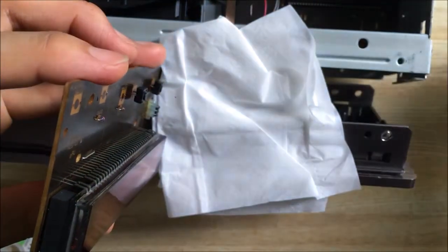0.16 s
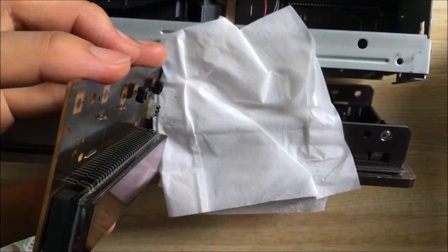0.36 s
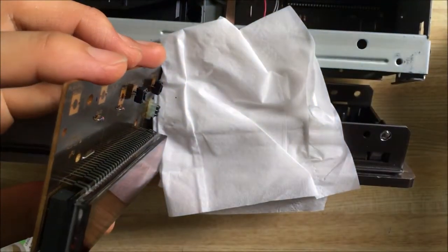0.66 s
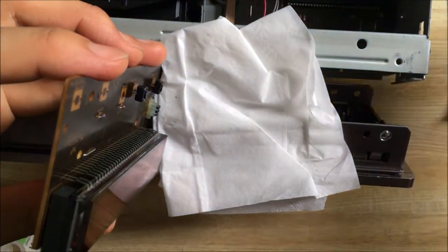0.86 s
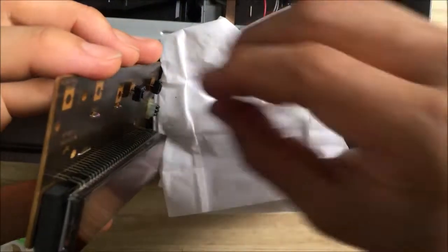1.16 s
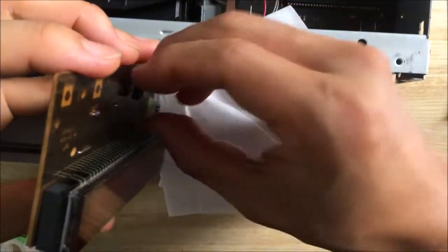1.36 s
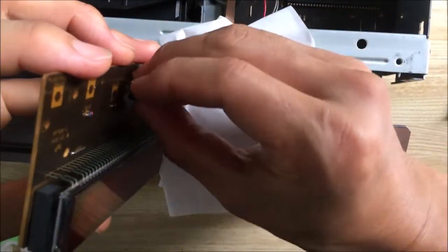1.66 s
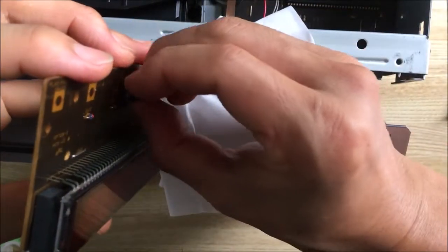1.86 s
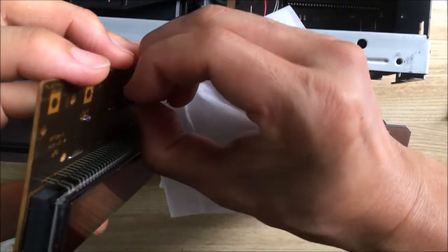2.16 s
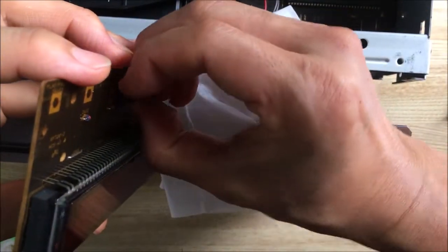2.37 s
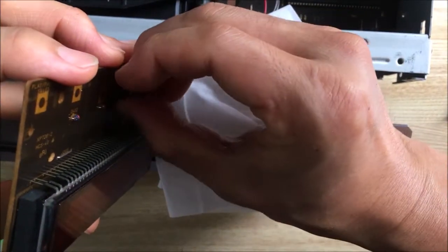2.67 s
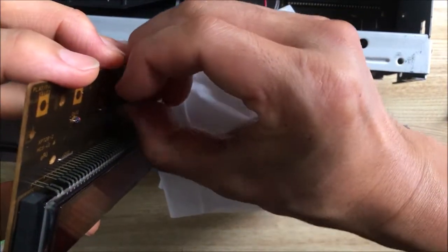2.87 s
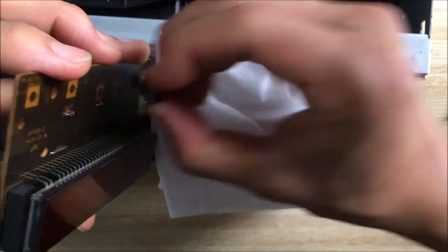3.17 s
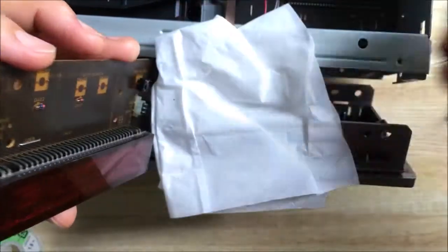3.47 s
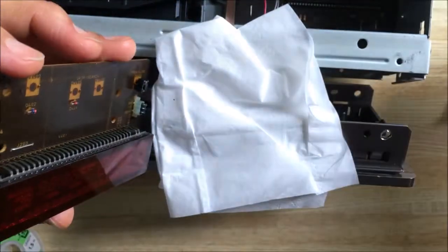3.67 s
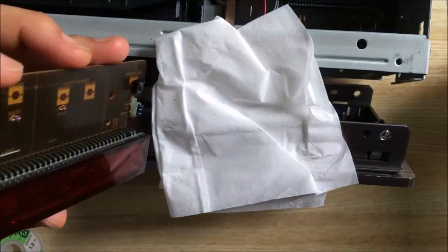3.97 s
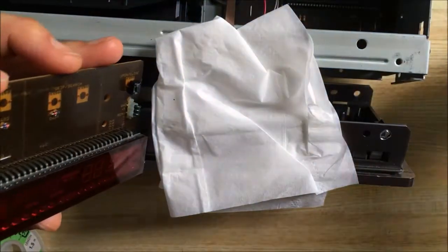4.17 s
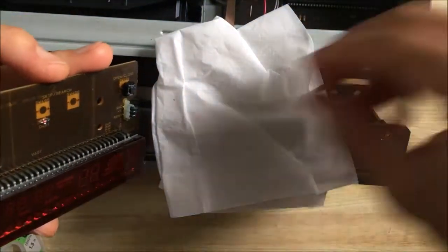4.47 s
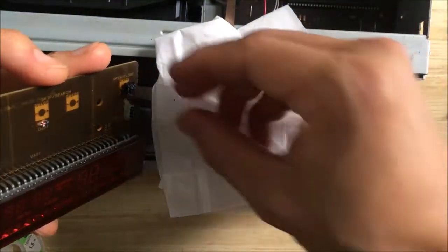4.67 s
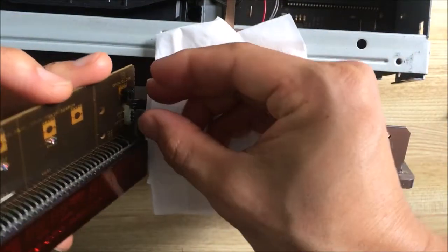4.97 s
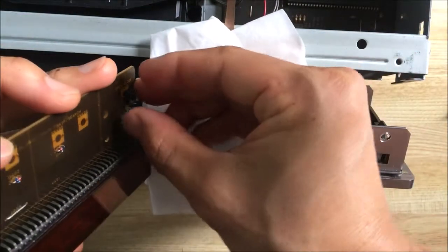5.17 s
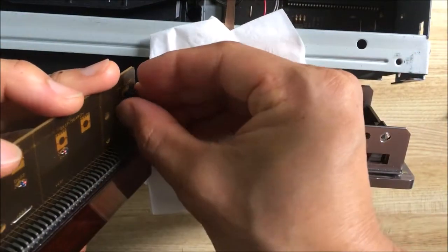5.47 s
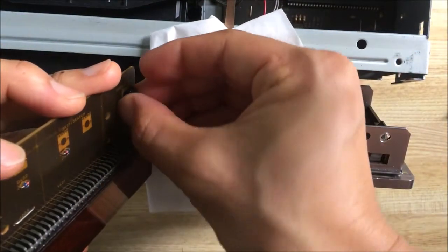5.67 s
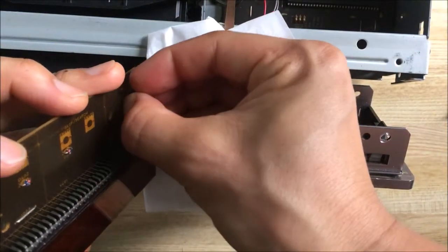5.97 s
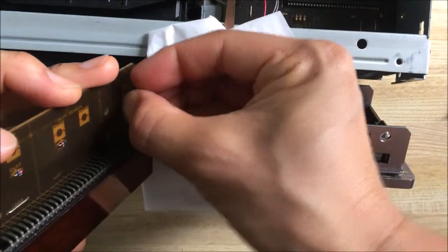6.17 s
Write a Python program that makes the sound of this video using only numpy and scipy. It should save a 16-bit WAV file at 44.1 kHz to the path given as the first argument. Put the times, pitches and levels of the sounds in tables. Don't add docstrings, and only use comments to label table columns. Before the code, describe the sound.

Close, dry clicks and tiny bright ticks from a little switch on a circuit board, over a wavering low rumble and soft hiss.

```python
import sys
import numpy as np
from scipy import signal
from scipy.fft import rfft, irfft
from scipy.io import wavfile
from scipy.ndimage import uniform_filter1d

SR = 44100
rng = np.random.default_rng(int(sys.argv[2]) if len(sys.argv) > 2 else 0)


def store_wav(level_fs):
    pcm = np.round(np.clip(np.atleast_2d(level_fs), -1, 1) * 32767)
    wavfile.write(sys.argv[1], SR, pcm.T.astype(np.int16))


def voltage_ratio(level):
    return 10 ** (np.asarray(level, float) / 20)


N = 278712

# t/s, level/dB
RUMBLE_LEVEL = [(0, -44.5), (.4, -45.5), (.62, -50.5), (1.05, -45), (1.25, -50.5), (1.55, -44),
                (1.8, -48.5), (2.3, -44), (2.75, -45), (3.1, -42), (3.5, -40), (4.0, -43.5), (4.35, -40),
                (4.75, -44), (5.2, -48.5), (5.7, -43), (6.1, -42.5), (6.32, -45)]
# f/Hz, density/dB
RUMBLE_COLOUR = [(20, -35), (35, -14), (50, 1), (69, 9), (85, 2), (110, -18.5), (150, -59.5)]
# t/s, depth/dB
LULLS = [(.52, 11), (1.13, 9), (1.45, 5), (1.96, 7), (2.03, 7), (2.18, 9), (2.33, 7.5), (2.52, 2.5),
         (2.8, 13), (2.93, 6), (3.16, 7.5), (3.33, 8.5), (3.67, 13), (3.99, 10), (4.549, 14), (4.81, 5.5),
         (4.92, 6.5), (5.12, 18), (5.66, 3), (5.98, 16), (6.25, 14)]
LULL_S = 0.027
# f/Hz, density/dB
AIR_COLOUR = [(59, -66), (100, 1), (124, -4.5), (155, -1.5), (253, -7), (332, -10), (396, -19), (693, -20),
              (862, -22), (2600, -30), (3380, -44), (5720, -120)]
# f/Hz, density/dB
HISS_COLOUR = [(1530, -49), (2600, -8), (3330, -4.5), (3790, -4), (4820, -4.5), (6080, 0.5), (7680, -11),
               (8930, -5.5), (10400, -9), (11300, -4.5), (13900, -3.5), (15100, -2.5), (15700, -4.5)]
AIR_DB, HISS_DB = -59, -67.5
# f/Hz, width/Hz, level/dB
FAN_LINES = [(1810, 24, -81.5), (2154, 4.3, -83.5)]

# start t/s, crackle level/dB, fade/(dB/s), length/s
RATTLE_BURSTS = [
    (1.0188, -41, 280, 0.018),
    (1.033, -43, 100, 0.005),
    (1.056, -45.5, 300, 0.078),
]
# f/Hz, density/dB
RATTLE_COLOUR = [(290, -40), (500, -2), (1020, -7), (1310, 1), (2120, -8), (3010, -5), (4470, -7),
                 (4880, -13.5), (14600, -11.5), (16400, -13.5)]
RATTLE_RISE_S = 0.0014
TONES_HZ = [280, 760, 1068, 1690, 1910, 3675, 11910, 12160, 14280]
# level/dB, t60/s
TONE_DECAYS = [(-40, .3), (-43, 0.2), (-42, 0.28), (-41.5, 0.18), (-42, 0.22), (-44, 0.22), (-41, .15),
               (-36, 0.18), (-31, 0.067)]
# t/s, length/s
TONES_SPAN = (1.036, 0.0273)
# t/s, level/dB
LATE_RINGS = [
    (1.0575, -40),
    (1.068, -42),
]
LATE_RING_HZ = 11100

# f/Hz, width/Hz, level/dB
DOME_MODES = [(11900, 700, -3), (12800, 700, -4), (13700, 800, -1.5), (15400, 800, -1)]
# f/Hz, width/Hz, level/dB
HOUSING_MODES = [(6800, 700, -2), (9300, 800, 0)]
# f/Hz, width/Hz, level/dB
PLATE_MODES = [(1200, 600, -14.5), (2100, 800, -14), (3100, 700, -10), (4270, 800, -10), (5500, 1000, -10)]
# t/s, dome, housing and board peak level/dB, board mode f/Hz
SNAPS = [(1.0205, -31, -36, -33, 3420), (1.0355, -32, -37, -47, 3600), (1.0366, -23, -46, -56, 1810),
         (1.058, -44, -39, -44, 1810), (1.0695, -55, -40.5, -63, 2990), (1.1132, -53, -54, -55, 3770),
         (2.351, -35, -45, -59, 4340), (2.4912, -53, -55, -55.5, 4040), (3.7465, -64, -63, -60, 2520),
         (2.919, -32.5, -42, -36.5, 3020), (2.9194, -56, -64, -39, 4270), (3.4262, -52, -57, -55.5, 3690),
         (3.7812, -60, -57, -50.5, 2700), (3.7816, -50, -51.5, -51, 3960), (6.1013, -29.5, -44, -48, 3000),
         (6.1032, -46, -52, -57, 4500), (6.1145, -48, -37.5, -42, 2800), (6.115, -53, -48, -42, 4970),
         (6.1177, -63, -55, -38, 1370), (6.1592, -63, -54, -55, 3470), (6.1662, -63, -55.5, -56, 3740)]
# t/s, peak level/dB, board mode f/Hz
TAPS = [(1.4425, -60, 3170), (3.388, -54, 2800), (3.3896, -46, 2700), (5.4912, -53, 3220),
        (5.494, -57.5, 2700), (5.5743, -59, 2460), (5.591, -56, 1760), (5.6022, -55, 2840),
        (5.6062, -54, 2750), (5.685, -54, 1490), (5.997, -63, 2130), (6.0626, -58, 1820),
        (6.2024, -62, 3390), (6.312, -61, 3200)]
TAP_DOME_DB, TAP_HOUSING_DB = -10, -13
# t/s, dome peak level/dB
PINGS = [(1.9605, -50), (1.9853, -49.5), (1.9962, -59), (2.0799, -64), (2.1346, -54), (2.3193, -60),
         (2.327, -45), (2.3347, -51), (2.3414, -54), (2.411, -56), (2.6033, -54), (2.7418, -55),
         (2.7466, -52), (2.7687, -50), (2.8059, -58), (2.905, -53), (2.9084, -58), (2.9113, -56),
         (2.9176, -45), (2.945, -60), (4.5365, -44), (4.5409, -44), (4.828, -56), (4.8356, -50),
         (5.4982, -47), (5.742, -57), (5.7919, -55.5), (5.803, -54), (5.9516, -57), (5.9635, -53)]
PING_HOUSING_DB, PING_PLATE_DB, DOME_SPOT_HZ = -9, -20, 3400
# start t/s, length/s, rate/(1/s)
CREEP = [(1.95, .12, 40), (2.39, .04, 60), (2.74, .17, 30), (5.68, .12, 25), (5.96, .06, 30)]
CREEP_DB, CREEP_SPREAD_DB = -62, 2.5
# t/s, peak level/dB
STUTTER = [(2.5767, -50), (2.5797, -40), (2.5814, -39), (2.585, -43), (2.5883, -48), (2.592, -38.5)]
STUTTER_HOUSING_DB, STUTTER_PLATE_DB = -6, -24.5

# t/s, peak level/dB, blow length/ms, grip damping factor
KNOCKS = [
    (1.022, -26, 0.75, 1),
    (1.028, -57, 1.6, 1.2),
    (1.036, -25.5, 0.74, 0.95),
    (1.033, -27, 1.64, 1.9),
    (1.055, -34, 0.36, 1.3),
    (1.071, -27.5, 1.05, 0.73),
    (1.092, -39, 0.6, 0.35),
    (3.88, -43, 1.1, 0.99),
    (4.152, -38, 1.7, 3.1),
]
# f/Hz, level/dB, t60/s
BODY_MODES = [(130, 8, 0.048), (202, 15, 0.037), (277.6, 15.5, 0.088), (379, 6.5, 0.052), (561, 2.5, 0.17),
              (800, 4, 0.08), (1280, 8, 0.081), (1890, -37, .05)]
# t/s, peak level/dB, blow length/ms, grip damping factor
RELEASES = [
    (6.1155, -34, 0.24, 1.3),
    (6.1178, -23.5, 0.85, 0.72),
]
# f/Hz, level/dB, t60/s
HELD_MODES = [(218, -7, 0.097), (294, 4, 0.047), (364, -3.5, 0.065), (527, -12.5, 0.069), (1024, -5, 0.025),
              (2150, -20, .05)]

# centre t/s, length/s, level/dB, lowest f/Hz, highest f/Hz
RUBS = [(1.45, 0.061, -65, 11000, 15900), (1.46, 0.074, -68.5, 2200, 4200),
        (2.34, 0.079, -64, 10900, 16000), (2.417, 0.065, -66.5, 9000, 15900),
        (2.937, 0.039, -81, 2000, 5000), (2.921, 0.015, -49, 11500, 16100), (4.17, 0.062, -69, 9000, 16000),
        (4.544, 0.072, -56.5, 5460, 15900), (4.835, 0.15, -65, 10400, 15000),
        (4.925, 0.59, -71.5, 8000, 15500), (5.051, 0.61, -68.5, 900, 4500), (5.082, 0.21, -67, 860, 1300),
        (4.633, 0.036, -59.5, 8750, 15400), (5.16, 0.13, -68, 5000, 15500),
        (5.597, 0.062, -64.5, 1490, 9300), (5.687, 0.026, -63, 900, 15000), (6.021, 0.094, -67, 1490, 9050),
        (6.122, 0.057, -60, 700, 3470), (6.245, 0.099, -60.5, 1500, 15500), (6.215, 0.32, -66.5, 685, 1430),
        (2.165, 0.041, -71, 1000, 3000), (5.493, 0.024, -57, 8060, 16000)]
# centre t/s, length/s, f/Hz, level/dB
WHINE_SWELLS = [(1.87, .75, 703, -72.5), (2.371, .5, 694, -69), (2.802, .3, 700, -78),
                (2.971, .2, 695, -75), (3.183, .12, 683, -68), (3.546, .4, 690, -78)]

STEADY_EDGE_HZ, SHARP_EDGE_HZ, LAST_EDGE_HZ = 15870, 15950, 16600
PAST_EDGE_DB = -18
# centre t/s of the first, frames, step level/dB, finely resolved below f/Hz
STARVED = [(0.151, 1, -98, 1400), (0.217, 1, -96.5, 1180), (1.495, 1, -98, 2420), (2.478, 1, -98, 1740),
           (2.669, 1, -95, 2310), (2.84, 2, -98, 910), (3.182, 1, -96.5, 1400), (3.288, 1, -95.5, 2220),
           (3.588, 2, -96, 1890), (3.926, 1, -96, 2000), (4.397, 1, -85, 2000), (4.461, 1, -102, 2410),
           (4.501, 1, -99.5, 2200), (4.568, 1, -94.5, 895), (4.632, 2, -91, 1100), (4.801, 1, -96.5, 1190),
           (5.317, 1, -98, 3200), (5.89, 1, -104.5, 2000), (6.189, 1, -75, 4640)]
HOP = 941


def evened(x):
    return x / np.sqrt(np.mean(x ** 2) + 1e-20)


def add(mix, s, sound):
    part = mix[round(s * SR):][:len(sound)]
    part += sound[:len(part)]


def coloured(x, points):
    f, db = np.transpose(points)
    hz = np.fft.rfftfreq(len(x), 1 / SR)
    gain = voltage_ratio(np.interp(np.log(hz + 1), np.log(f + 1), db))
    return evened(irfft(rfft(x) * gain, len(x)))


def ring(modes, seconds, detune=1):
    t = np.arange(round(seconds * SR)) / SR
    return sum(voltage_ratio(db - 60 * t / t60) * np.sin(2 * np.pi * hz * detune * t) for hz, db, t60 in modes)


def rumble(steadied=0.5):
    t = np.arange(N) / SR
    db = np.interp(t, *np.transpose(RUMBLE_LEVEL))
    for s, depth_db in LULLS:
        db -= depth_db * np.exp(-((t - s) / LULL_S) ** 2)
    x = coloured(rng.standard_normal(N), RUMBLE_COLOUR)
    beats = np.sqrt(uniform_filter1d(uniform_filter1d(x ** 2, 700), 700) + 0.01)
    return voltage_ratio(db) * evened(x / beats ** steadied)


def air_and_hiss():
    air = voltage_ratio(AIR_DB) * coloured(rng.standard_normal(N), AIR_COLOUR)
    return air + voltage_ratio(HISS_DB) * coloured(rng.standard_normal(N), HISS_COLOUR)


def fan():
    out = np.zeros(N)
    for hz, width, db in FAN_LINES:
        line = [(hz - 3 * width, -40), (hz, 0), (hz + 3 * width, -40)]
        out += voltage_ratio(db) * coloured(rng.standard_normal(N), line)
    return out


def rattle(grain_db=1.0, lift_db=6.5):
    level = np.zeros(N)
    for s, db, fade_db, seconds in RATTLE_BURSTS:
        t = np.arange(0, seconds, 1 / SR)
        add(level, s, np.minimum(t / RATTLE_RISE_S, 1) * voltage_ratio(db - fade_db * t))
    unevenness = np.repeat(voltage_ratio(grain_db * rng.standard_normal(N // 40 + 1)), 40)[:N]
    grains = rng.standard_normal(N) * unevenness
    out = level * voltage_ratio(lift_db) * coloured(grains, RATTLE_COLOUR)
    free = ring([(hz, db, t60) for hz, (db, t60) in zip(TONES_HZ, TONE_DECAYS)], TONES_SPAN[1])
    add(out, TONES_SPAN[0], free * signal.windows.tukey(len(free), .15))
    for s, db in LATE_RINGS:
        add(out, s, ring([(LATE_RING_HZ, db, .02)], .03))
    return out


def touches():
    pings = list(PINGS)
    for start, seconds, rate in CREEP:
        place, size = rng.random((12, 2))[:round(seconds * rate)].T
        pings += zip(start + seconds * place, CREEP_DB + CREEP_SPREAD_DB * (2 * size - 1))
    rows = list(SNAPS)
    rows += [(s, db, db + STUTTER_HOUSING_DB, db + STUTTER_PLATE_DB, DOME_SPOT_HZ) for s, db in STUTTER]
    rows += [(s, db + TAP_DOME_DB, db + TAP_HOUSING_DB, db, hz) for s, db, hz in TAPS]
    rows += [(s, db, db + PING_HOUSING_DB, db + PING_PLATE_DB, DOME_SPOT_HZ) for s, db in pings]
    return rows


def ticks(chatter=0.078, boost_db=6.0, rise_s=0.00016, fall_s=0.00061, spot_width=480, spot_db=-2):
    out, t, rows = np.zeros(N), np.arange(60) / SR, touches()
    detune = rng.uniform(.985, 1.015, (len(rows), 3))
    contact = rng.standard_normal((len(rows), 60))
    swell = np.minimum(np.arange(500) / 12, 1) ** 2
    for (s, *levels_db, spot_hz), off, bump in zip(rows, detune, contact):
        snap = chatter * bump ** 3 * np.minimum(t / rise_s, 1) * np.exp(-t / fall_s)
        snap = snap + (abs(t - rise_s) < .5 / SR)
        board = list(PLATE_MODES) + [(spot_hz, spot_width, spot_db)]
        groups = (DOME_MODES, HOUSING_MODES, board)
        for db, group, d, sign in zip(levels_db, groups, off, (-1, 1, 1)):
            modes = [(hz, g, np.log(1000) / np.pi / width) for hz, width, g in group]
            body = sum(sign ** k * ring([m], 500 / SR, d) for k, m in enumerate(modes))
            part = np.convolve(snap, swell * body)
            add(out, s - .0005, voltage_ratio(db + boost_db) * part / abs(part).max())
    return out


def knocks(blows, modes):
    out = np.zeros(N)
    for s, db, ms, grip in blows:
        body = ring([(hz, g, t60 / grip) for hz, g, t60 in modes], 0.15)
        thud = np.convolve(np.hanning(round(ms * SR / 1000) + 3), body)
        add(out, s, voltage_ratio(db) * thud / abs(thud).max())
    return out


def rubs(grain_db=3.5):
    out = np.zeros(N)
    for s, seconds, db, low_hz, high_hz in RUBS:
        n = round(seconds * SR)
        unevenness = np.repeat(voltage_ratio(grain_db * rng.standard_normal(SR // 60)), 60)[:n]
        grains = rng.standard_normal(SR)[:n] * unevenness
        band = [(low_hz * 0.54, -30), (low_hz, 0), (high_hz, 0), (high_hz * 1.95, -25)]
        add(out, s - seconds / 2, voltage_ratio(db) * np.hanning(n) * coloured(grains, band))
    return out


def whine():
    out = np.zeros(N)
    for s, seconds, hz, db in WHINE_SWELLS:
        t = np.arange(0, seconds, 1 / SR)
        tone = np.sqrt(2) * voltage_ratio(db) * np.sin(2 * np.pi * hz * t)
        add(out, s - seconds / 2, np.hanning(len(t)) * tone)
    return out


def walls(x, t60=0.19, wet_db=-17.0):
    t = np.arange(SR // 3) / SR
    sparse = (rng.random(len(t)) < .08) * (t > .002)
    taps = rng.choice([-1., 1.], len(t)) * sparse * voltage_ratio(-60 * t / t60)
    taps = signal.lfilter([1], [1, -.5], taps)
    return x + voltage_ratio(wet_db) * signal.oaconvolve(x, taps / np.linalg.norm(taps))[:N]


def below(x, hz):
    return signal.oaconvolve(x, signal.firwin(401, hz, window=("kaiser", 9), fs=SR), "same")


def scene():
    snaps, past = ticks(), voltage_ratio(PAST_EDGE_DB)
    sharp = (1 - past) * below(snaps, SHARP_EDGE_HZ) + past * below(snaps, LAST_EDGE_HZ)
    thuds = knocks(KNOCKS, BODY_MODES) - knocks(RELEASES, HELD_MODES)
    hands = walls(sharp + thuds + rubs()) - sharp + rattle()
    background = rumble() + air_and_hiss() + fan() + whine()
    return (sharp + below(hands + background, STEADY_EDGE_HZ))[None]


def starve(x):
    out, i, line = x.copy(), np.arange(2 * HOP) + .5, np.arange(HOP) + .5
    window = np.sin(np.pi * i / (2 * HOP))
    basis = window * np.cos(np.pi / HOP * np.outer(line, i + HOP / 2))
    bands_db = 5. * rng.standard_normal((len(STARVED), HOP // 16 + 1))
    for (s, frames, step_db, safe_hz), band_db in zip(STARVED, bands_db):
        step = HOP * voltage_ratio(step_db + 14.5 + np.repeat(band_db, 16)[:HOP])
        poor = line * SR / (2 * HOP) > safe_hz
        for k in range(round(frames)):
            start = round(s * SR) + (k - 1) * HOP
            lines = basis @ x[start:start + 2 * HOP]
            lost = poor * (lines - step * np.round(lines / step))
            out[start:start + 2 * HOP] -= 2 / HOP * lost @ basis
    return out


def roll_off(x):
    return signal.sosfilt(signal.butter(12, 16820, fs=SR, output="sos"), x)


def record(dry):
    heard = signal.sosfilt(signal.butter(3, 38, "high", fs=SR, output="sos"), dry[0])
    return roll_off(starve(heard)[None])


dry = scene()
out = record(dry)
store_wav(out)
```